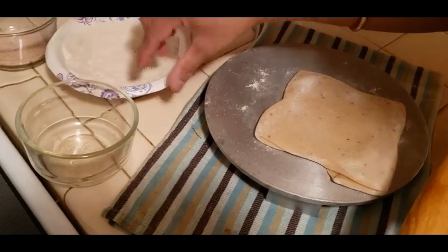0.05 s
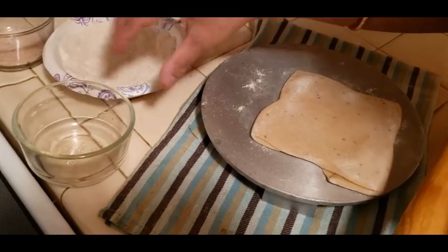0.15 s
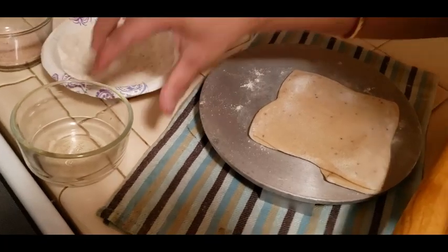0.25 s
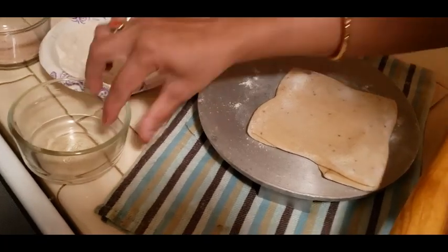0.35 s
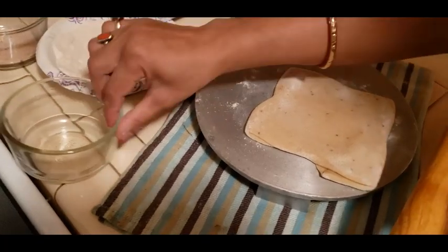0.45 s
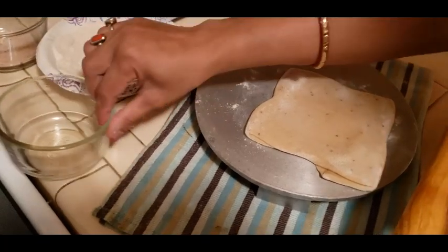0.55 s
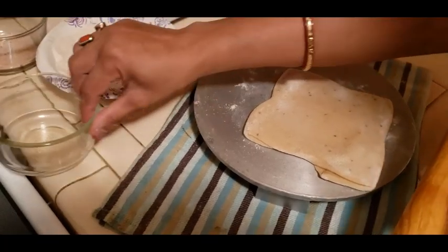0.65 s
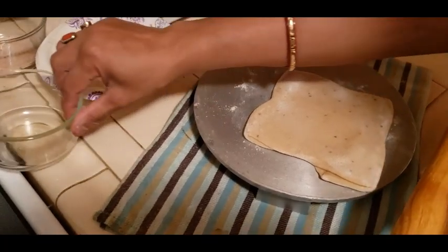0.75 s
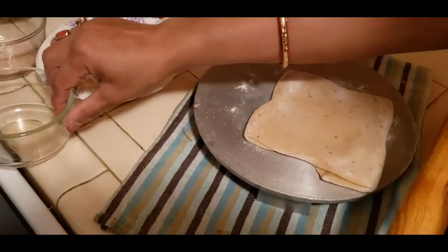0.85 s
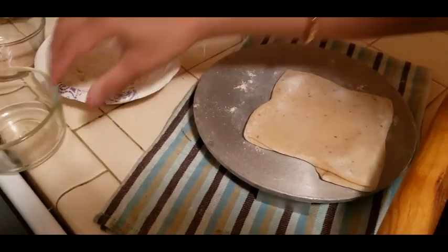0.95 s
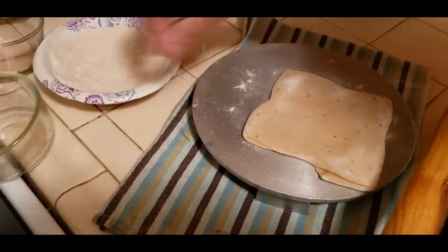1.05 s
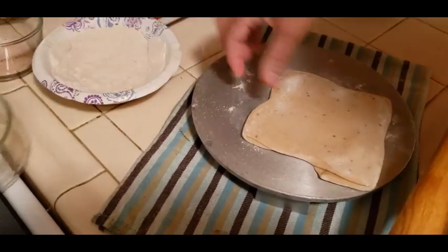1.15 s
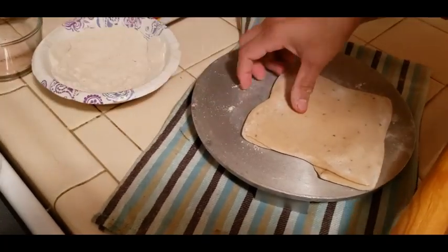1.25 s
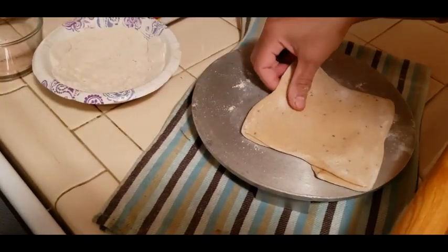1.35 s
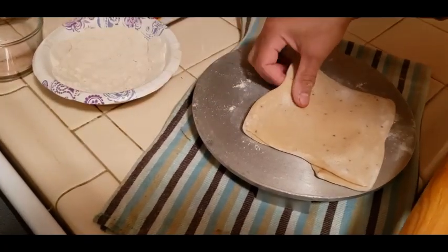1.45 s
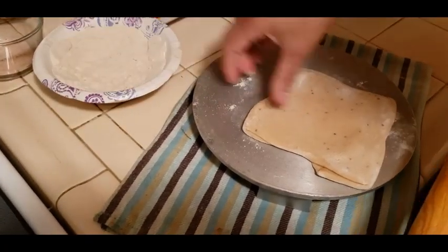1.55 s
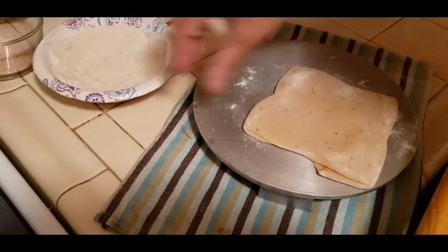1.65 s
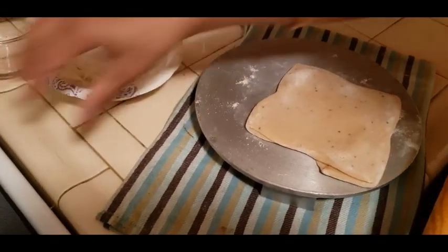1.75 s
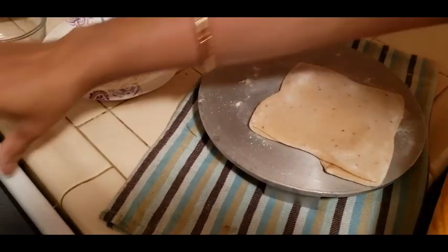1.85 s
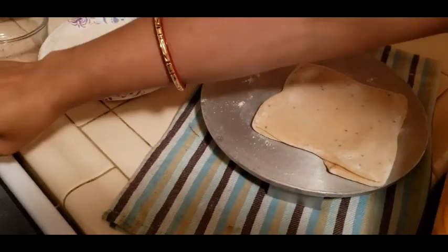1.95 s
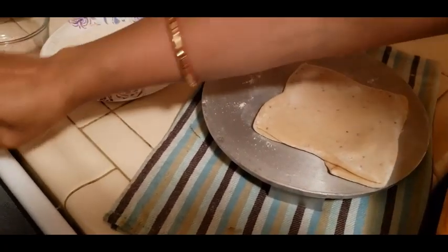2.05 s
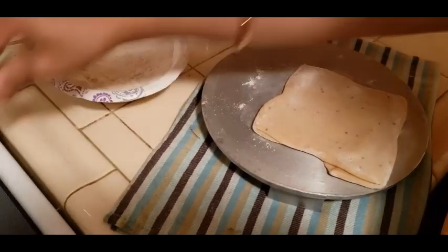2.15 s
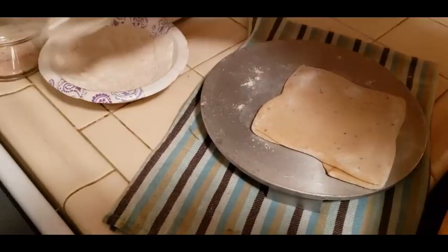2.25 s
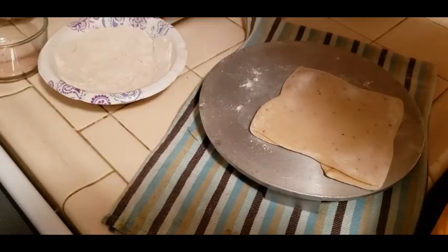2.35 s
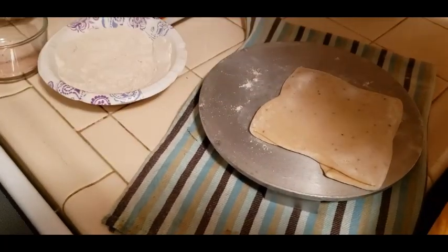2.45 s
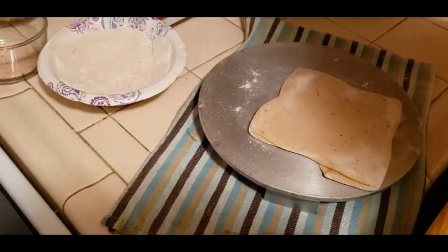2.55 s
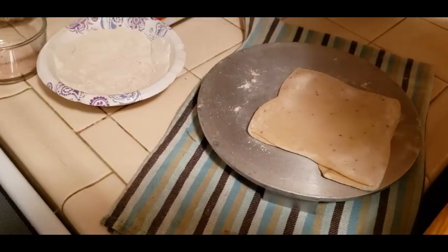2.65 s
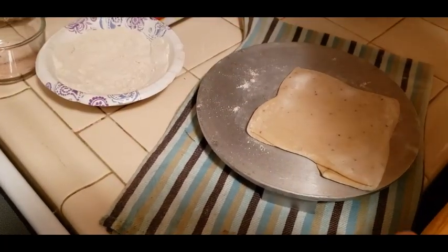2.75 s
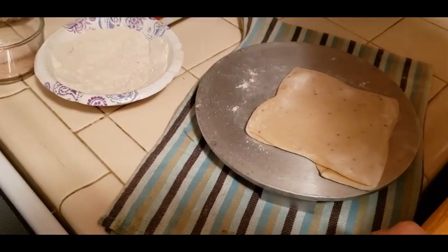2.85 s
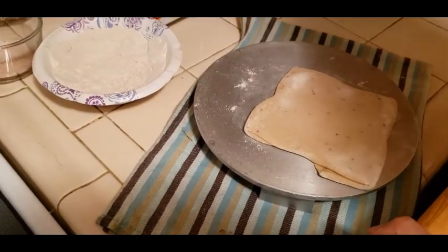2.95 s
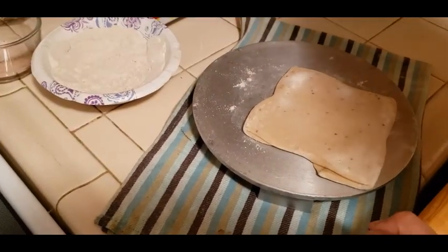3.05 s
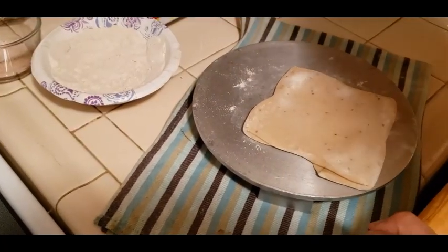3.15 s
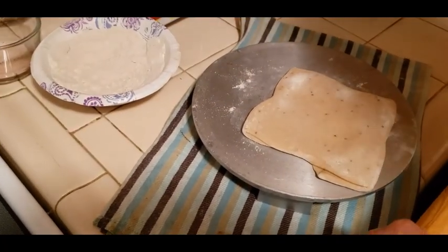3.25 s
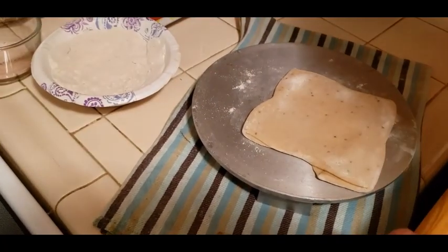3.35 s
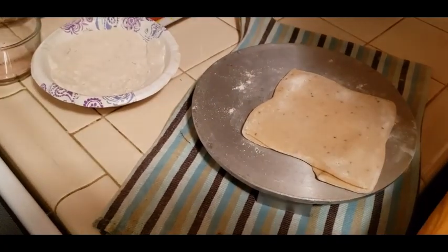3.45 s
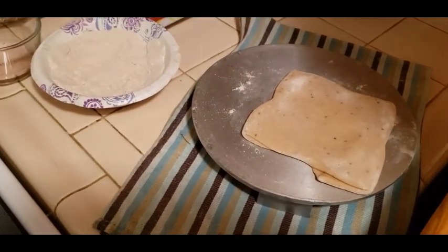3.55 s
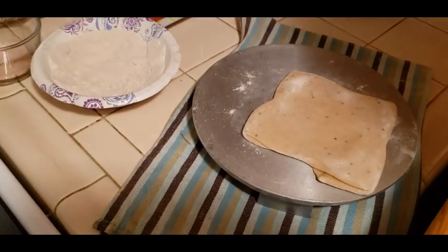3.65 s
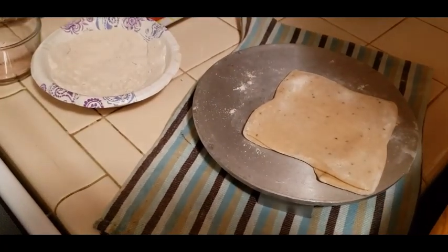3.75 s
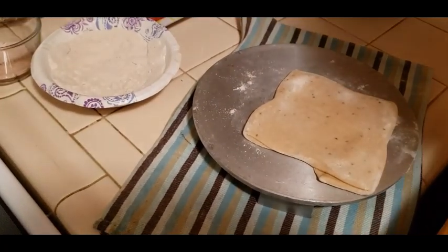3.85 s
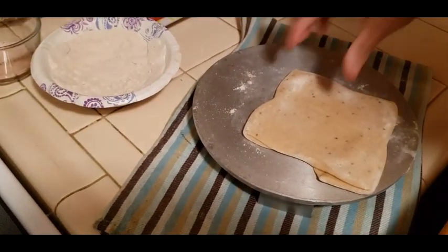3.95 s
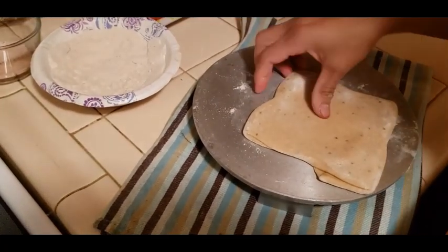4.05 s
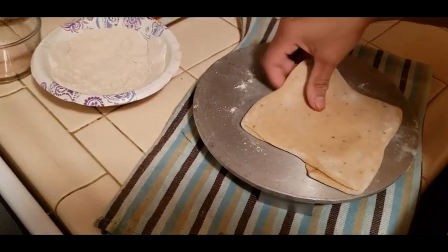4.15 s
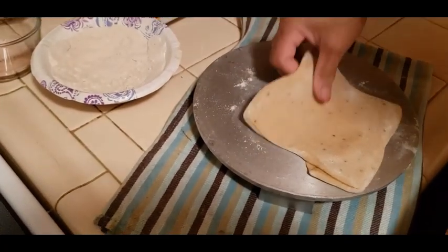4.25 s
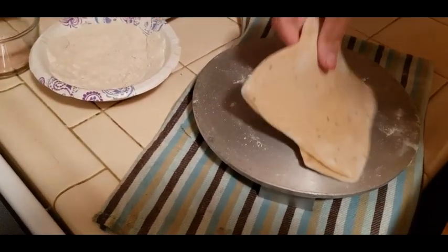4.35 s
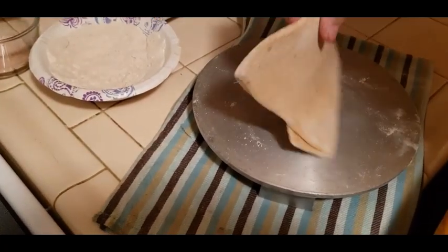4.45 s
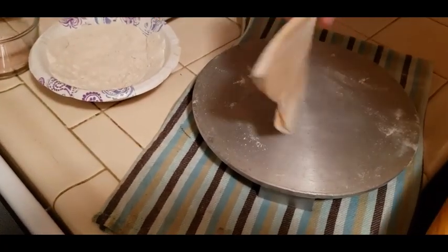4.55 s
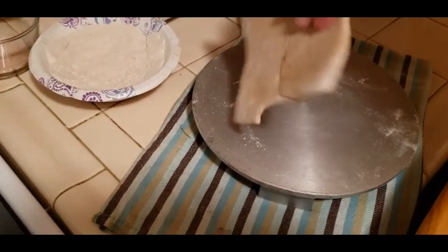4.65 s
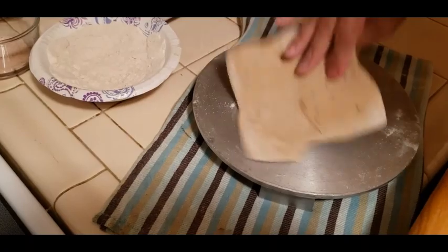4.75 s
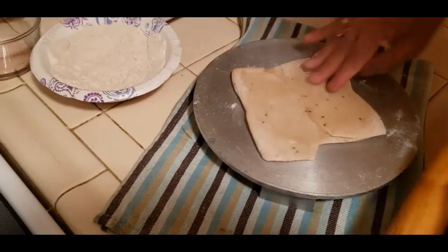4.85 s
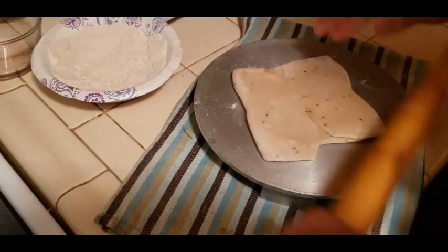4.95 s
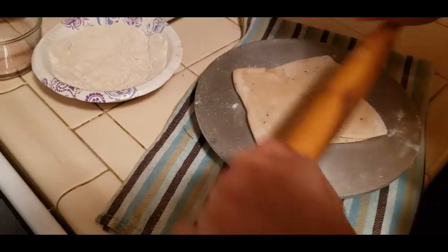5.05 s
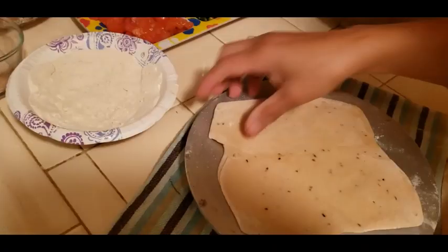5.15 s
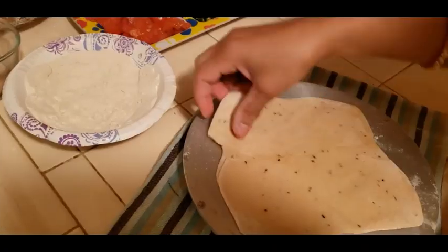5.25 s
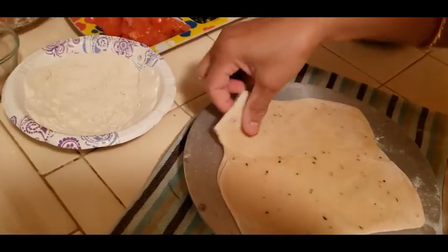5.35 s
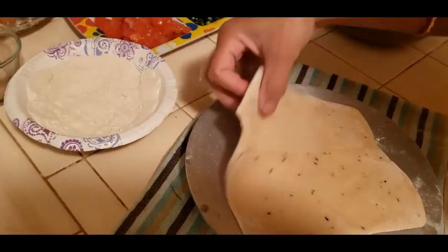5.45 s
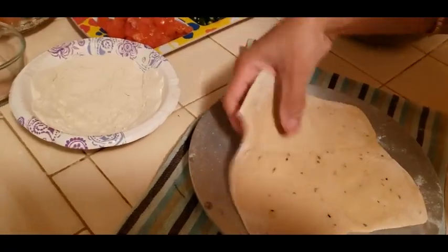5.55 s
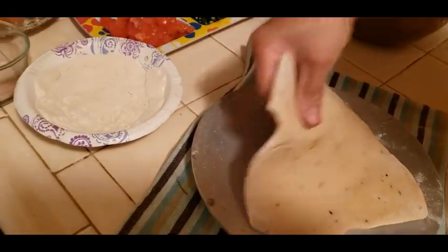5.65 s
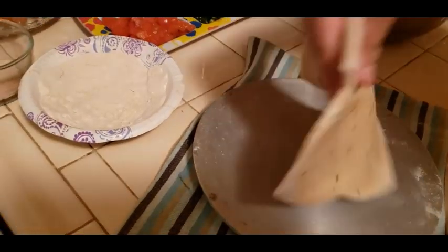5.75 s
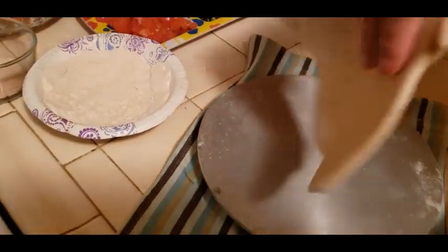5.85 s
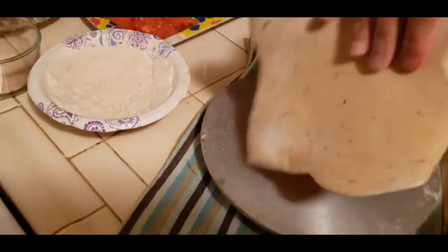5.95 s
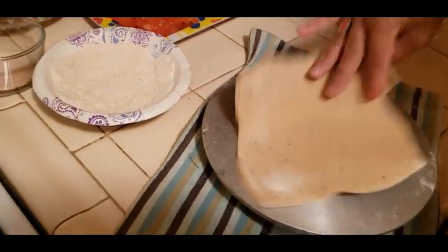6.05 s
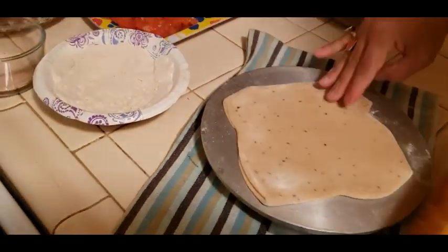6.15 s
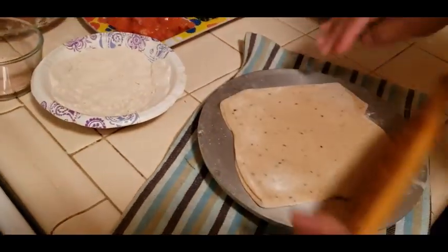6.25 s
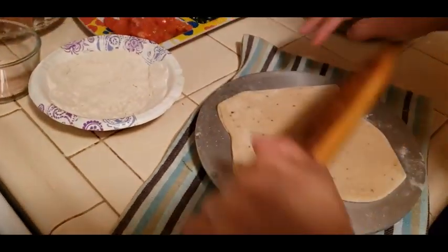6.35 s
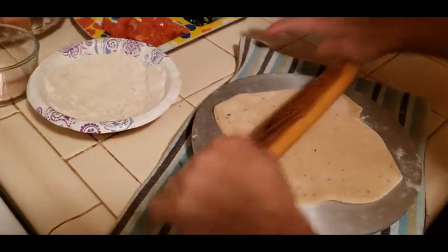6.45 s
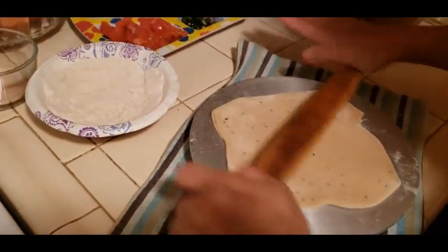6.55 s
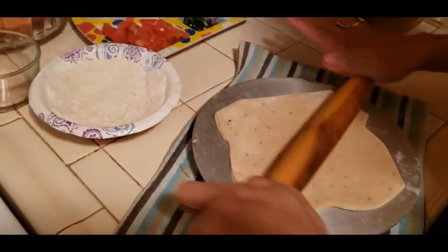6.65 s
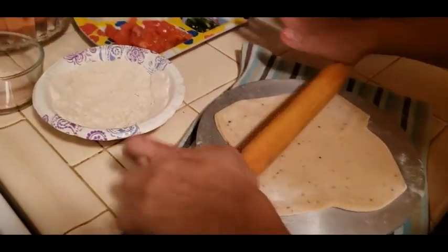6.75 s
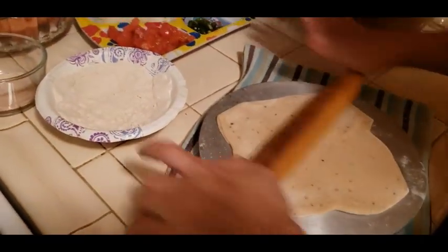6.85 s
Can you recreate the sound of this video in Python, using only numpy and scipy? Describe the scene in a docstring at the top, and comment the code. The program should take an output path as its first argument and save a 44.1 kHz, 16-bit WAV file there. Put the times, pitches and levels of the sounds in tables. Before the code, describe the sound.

A glass bowl scrapes and clatters across kitchen tiles, a wooden pin clacks twice, then dough slaps on a metal plate over a refrigerator hum.

```python
"""Bowl, rolling pin and dough at a kitchen counter

A glass bowl is pushed over tiles and clatters: struck modes and noise bursts over a gritty drag.
A wooden rolling pin knocks twice, as short clacks with wood modes. Dough is twice peeled off a metal plate
and slapped back, then the pin thuds onto it and rolls: wet noise, plate modes, bass thuds, rubbing strokes.
A refrigerator hums underneath in wavering sines and fan noise; diffuse echoes give a small hard room."""
import sys
import numpy as np
from scipy import signal
from scipy.fft import irfft
from scipy.io import wavfile
from scipy.ndimage import uniform_filter1d

SR = 44100
rng = np.random.default_rng(int(sys.argv[2]) if len(sys.argv) > 2 else 0)


def int16_out(signal):
    """Quantize to a 16-bit WAV file."""
    q = np.round(np.clip(np.atleast_2d(signal).T, -1, 1) * 32767)
    wavfile.write(sys.argv[1], SR, q.astype(np.int16))


N = 303836
TIME = np.arange(N) / SR
AGE = np.arange(int(SR * .6)) / SR  # seconds since a blow


def undb(db):
    """Decibels to gain."""
    return 10 ** (np.asarray(db) / 20)


def along(points, hz):
    """Read (Hz, value) points on a log-frequency axis."""
    point_hz, value = np.transpose(points)
    return np.interp(np.log(hz + 1e-3), np.log(point_hz), value)


def fade(t60_s):
    """Exponential decay of 60 dB in t60_s."""
    return np.exp(-np.log(1000) * AGE / t60_s)


def onset(rise_s):
    """A contact builds up with time constant rise_s."""
    return 1 - np.exp(-AGE / rise_s)


def ramp(start_s, length_s):
    """Smooth rise from 0 to 1 from start_s."""
    return np.sin(np.pi / 2 * np.clip((TIME - start_s) / length_s, 0, 1)) ** 2


STROKE_SHARPNESS = 1.78  # exponent


def stroke(start_s, rise_s):
    """Speed of a stroke: swells to 1 in rise_s and tails off more slowly."""
    x = np.maximum(TIME - start_s, 0) / rise_s
    return (x * np.exp(1 - x)) ** STROKE_SHARPNESS


def unit(x):
    """Scale to rms 1."""
    return x / np.sqrt(np.mean(x ** 2))


def blow(x):
    """Scale a blow to rms 1 over its first 30 ms."""
    return x / np.sqrt(np.mean(x[:, :int(.03 * SR)] ** 2))


def pan(x, left_db):
    """Set left minus right to left_db."""
    return x * undb(np.array([[left_db], [-left_db]]) / 2)


def add(out, start_s, x):
    """Mix x into out from start_s."""
    i = int(start_s * SR)
    out[:, i:i + x.shape[1]] += x[:, :N - i]


def walk(rate_hz):
    """Random levels, slow or fast, held 1 / rate_hz and slewed, rms 1."""
    hold = int(SR / rate_hz)
    steps = np.repeat(rng.standard_normal(N // hold + 1), hold)
    slewed = uniform_filter1d(uniform_filter1d(steps, hold), hold)
    return unit(slewed[:N])


# Likeness of left and right. Each row: frequency in Hz, correlation.
LIKENESS = [(100, .92), (280, 1), (550, 0.32), (1100, -0.014), (2200, -0.3), (5000, 0)]


def noise(spectrum, size):
    """Stereo noise of a given colour, rms 1, alike on both sides in the bass only."""
    hz = np.fft.rfftfreq(size, 1 / SR)
    mid, side = np.exp(2j * np.pi * rng.random((2, len(hz))))
    alike = np.clip(along(LIKENESS, hz), -1, 1)
    pair = mid * np.sqrt(1 + alike) + side * np.sqrt(1 - alike) * np.array([[1], [-1]])
    return unit(irfft(pair * undb(along(spectrum, hz)), size))


def ring(modes, pitch=1):
    """Struck modes as decaying sines; the higher ones reach the two sides in different phases."""
    out = 0
    for hz, db, t60_s in modes:
        alike = np.clip(along(LIKENESS, hz), -1, 1)
        apart = np.arccos(alike) * np.array([[.5], [-.5]])
        phase = 2 * np.pi * (hz * pitch * AGE + rng.random()) + apart
        out = out + undb(db) * fade(t60_s) * np.sin(phase)
    return out * onset(0.00047)


def hump(hz, skirt_db):
    """Spectrum of one broad resonance, skirt_db an octave away."""
    return [(hz * 2. ** k, skirt_db * abs(k) ** 2.2) for k in (-2, -1, -.5, 0, .5, 1, 2, 4)]


def favour(modes, centre_hz, db_per_octave):
    """The place of a blow favours the modes around one pitch."""
    return [(hz, db + db_per_octave * abs(np.log2(hz / centre_hz)), t60_s) for hz, db, t60_s in modes]


def room(sound, t60_s, treble_t60_s):
    """Diffuse echo of a small hard room: decaying noise whose treble has its own t60."""
    low_colour = [(60, -10.5), (300, -2), (2500, -2.5), (7000, -7.5), (15000, -31.5)]  # Hz, dB per Hz
    high_colour = [(2000, -14.5), (6000, -1.0), (15000, 2)]
    low = noise(low_colour, len(AGE)) * fade(t60_s)
    high = noise(high_colour, len(AGE)) * fade(treble_t60_s)
    tail = (low + undb(5) * high) * onset(.007)
    tail = tail / np.sqrt(np.sum(tail ** 2) / 2)
    return signal.fftconvolve(sound, tail, axes=1)[:, :N]


# Refrigerator lines. Each row: frequency in Hz, rms level in dB before the gains in kitchen().
HUM_LINES = [(118.4, -66), (161.5, -69), (317.6, -62.5), (414.5, -74), (479.1, -72.5), (915.2, -77.5),
             (1238, -82.5), (1437, -89.5)]
# Standing waves put each line to one side. Each row: frequency in Hz, left minus right in dB.
HUM_SIDE = [(120, 4), (318, -2), (900, 2)]
# Fan spectrum. Each row: frequency in Hz, relative level in dB per Hz.
FAN_COLOUR = [(22, -34.5), (38, -5.5), (65, -12), (100, -14), (140, -7.5), (250, -17.5), (292, -12),
              (319, -0.5), (352, -14.5), (620, -15), (1700, -31.5), (3800, -43), (7600, -40.5), (9200, -51)]
FAN_REL_DB, HUM_REL_DB, KITCHEN_GAIN_DB = -55.5, 1.92, 6.5
# The background sinks for a while and comes back.
LULL_START_S, LULL_END_S, LULL_FADE_S, LULL_DB = 1.2, 3.46, .75, -6


def kitchen():
    """Refrigerator lines waver in phase and level over the soft noise of its fan."""
    hum = 0
    for hz, db in HUM_LINES:
        phase = 2 * np.pi * hz * TIME + .7 * walk(14)
        level = np.sqrt(2) * undb(db + 1.7 * walk(10))
        hum = hum + level * pan(np.sin(phase), along(HUM_SIDE, hz))
    fan = noise(FAN_COLOUR, N) * undb(FAN_REL_DB + 0.1 * walk(6.9))
    lull = ramp(LULL_START_S, LULL_FADE_S) - ramp(LULL_END_S, LULL_FADE_S)
    return (pan(fan, left_db=1.5) + undb(HUM_REL_DB) * hum) * undb(KITCHEN_GAIN_DB + LULL_DB * lull)


# Strokes of fingers, dough and pin. Each row: start in seconds, time to full speed in seconds, level in dB.
RUBS = [(0, 0.033, -57.5), (4.095, 0.03, -54), (4.16, 0.051, -54.5), (4.33, 0.083, -59),
        (5.08, 0.045, -64.5), (5.28, 0.073, -55.5), (5.4, 0.085, -59.5), (5.58, 0.066, -59.5),
        (5.77, 0.037, -60.5), (6.44, 0.12, -64), (6.61, 0.11, -60), (6.79, .07, -59.5)]
# Sliding on flour. Each row: frequency in Hz, relative level in dB per Hz.
RUB_COLOUR = [(300, -2), (900, 11), (2000, 5.5), (3000, 6), (4200, 1), (6500, 1.5), (10000, -2.5),
              (13000, 1), (15500, -11)]
GRAINS_PER_S, GRAIN_T60_S, GRAIN_REL_DB = 55, .012, -9.5  # level re sliding
# The pin brushes the palm as it starts to roll.
ROLL_START_S, ROLL_ATTACK_S, ROLL_DB = 6.785, 0.061, -53.5


def rubbing():
    """Floury skin and dough slide in tiny slips over grains of flour; the turning pin adds a narrower hiss."""
    slips = unit(undb(0.56 * walk(400) + 1.04 * walk(47)))
    ticks = (rng.random(N) < GRAINS_PER_S / SR) * rng.standard_normal(N)
    grain = noise(RUB_COLOUR, len(AGE)) * fade(GRAIN_T60_S)
    grains = unit(signal.fftconvolve(ticks[None], grain, axes=1)[:, :N])
    speed = np.sqrt(sum((undb(db) * stroke(start_s, rise_s)) ** 2 for start_s, rise_s, db in RUBS))
    sliding = (slips * noise(RUB_COLOUR, N) + undb(GRAIN_REL_DB) * grains) * speed
    roll = undb(ROLL_DB) * ramp(ROLL_START_S, ROLL_ATTACK_S)
    return sliding + slips * noise(hump(3500, skirt_db=-40), N) * roll


# Pushes of the bowl over the tiles. Each row: start in seconds, length in seconds, starting level in dB.
PUSHES = [(.53, .55, -49), (1.09, 0.44, -31.5)]
PUSH_ATTACK_S, PUSH_RELEASE_S, PUSH_SAG_DB_PER_S = .02, 0.05, 33
# Glass modes, the high ones in close groups, a thin shimmering ring.
# Each row: frequency in Hz, relative level in dB, t60 in seconds.
GLASS_MODES = [(1967, 3, .33), (3311, -11, .22), (4570, -9, .18), (7460, -9, .05), (7532, 1, .14),
               (7620, -8, .06), (7950, -17, .1), (12100, -10, .06), (12190, -6, .08), (12260, -5, .09),
               (12380, -10, .07), (15400, -13, .07), (15480, -10, .1), (15590, -13, .07)]


def drag():
    """The foot sticks and slips on the tiles, fading as each push slows, and keeps the glass singing faintly."""
    grit_colour = [(150, -13.0), (550, 0.0), (850, 2.5), (1400, -2.5), (2500, -15.5), (4500, -21),
                   (15000, -29.5)]  # Hz, dB per Hz
    grit = unit(noise(grit_colour, N) * undb(3 * walk(300)))
    singing = unit(signal.fftconvolve(rng.standard_normal((2, N)), ring(GLASS_MODES), axes=1)[:, :N])
    effort = 0
    for start_s, length_s, db in PUSHES:
        sagging = undb(db - PUSH_SAG_DB_PER_S * np.maximum(TIME - start_s, 0))
        gate = ramp(start_s, PUSH_ATTACK_S) * (1 - ramp(start_s + length_s, PUSH_RELEASE_S))
        effort = effort + sagging * gate
    return pan(grit + undb(-15.5) * singing, left_db=-0.5) * effort


# Bowl on tile. Each row: start in seconds, force in dB, clack level in dB, clack pitch in Hz,
# glass ring level in dB, pitch that rings most in Hz.
KNOCKS = [(0.534, -45.5, -39, 1030, -62, 7500), (.64, -54.5, -54, 1100, -53, 9100),
          (1.088, -25.5, -22, 1193, -26.5, 9500), (1.128, -31.5, -22, 1300, -25.5, 12200),
          (1.15, -40, -36, 1700, -26.5, 1967), (1.177, -27, -26, 1400, -26, 5490),
          (1.2357, -24, -22.5, 2500, -27.5, 7026), (1.262, -31.5, -27, 1150, -30, 7500),
          (1.374, -22, -24.5, 800, -15.5, 7500), (1.384, -28, -27, 550, -29, 3000),
          (1.954, -46, -70, 600, -53, 2500), (1.989, -47.5, -68, 600, -53, 2700)]
# Counter and tile modes. Each row: frequency in Hz, relative level in dB, t60 in seconds.
COUNTER_MODES = [(122.5, -2, 0.38), (168.2, -4, 0.11), (245.6, -5, 0.056), (323.8, -5.5, 0.2),
                 (498.6, -2.5, 0.1), (581.3, -1.5, 0.26), (834, -4.5, 0.22)]
TILE_MODES = [(1149, -3, 0.059), (1202, 0.5, 0.088), (1376, 1, 0.11), (1390, -4.5, 0.045),
              (1610, -7, 0.098), (1657, -6.5, .14), (2300, -3.5, 0.21), (2618, -4.5, 0.13)]
# Noise of the counter and of the crack. Each row: frequency in Hz, relative level in dB per Hz.
THUMP_COLOUR = [(50, -28), (110, -4), (220, 2.5), (550, -1.5), (900, -8), (1800, -33.5)]
CRACK_COLOUR = [(900, -27.5), (2000, -7), (3000, -1), (4500, -6.5), (7000, -13), (10000, -19), (15500, -24)]
# Clack spectrum. Each row: multiple of the clack pitch, relative level in dB per Hz.
CONTACT_COLOUR = [(.2, -31), (.6, -9.5), (.9, 2.5), (1.15, 0), (1.5, -6), (2.1, -9.5), (3.199, -28),
                  (6, -48.5)]
KNOCK_T60_S, CRACK_T60_S, RING_DB_PER_OCTAVE = 0.15, 0.11, -9
# The crack equals the force at HARD_DB and grows faster than it.
HARD_DB, CRACK_GROWTH_DB_PER_DB = -26, 2.2


def knocks():
    """Each knock shakes the counter, clacks and cracks at the contact, and rings the glass by where it lands."""
    out = np.zeros((2, N))
    for start_s, force_db, clack_db, clack_hz, ring_db, ring_hz in KNOCKS:
        rumble = blow(noise(THUMP_COLOUR, len(AGE)) * fade(0.12))
        thump = blow(blow(ring(COUNTER_MODES)) + undb(-1.0) * rumble) * onset(.002)
        # the contact sets which tile modes speak
        contact = hump(clack_hz, skirt_db=-8.0)
        tile = ring([(hz, db + along(contact, hz), t60_s) for hz, db, t60_s in TILE_MODES])
        colour = [(clack_hz * ratio, db) for ratio, db in CONTACT_COLOUR]
        burst = blow(noise(colour, len(AGE)) * fade(KNOCK_T60_S) * onset(.0005))
        clack = blow(burst + undb(-5.0) * blow(tile))
        # glass chatters on the glaze
        chatter = undb(1.7 * walk(600)[:len(AGE)])
        crack = blow(noise(CRACK_COLOUR, len(AGE)) * fade(CRACK_T60_S) * chatter * onset(.0004))
        crack_db = HARD_DB + CRACK_GROWTH_DB_PER_DB * (force_db - HARD_DB)
        glass = ring(favour(GLASS_MODES, ring_hz, RING_DB_PER_OCTAVE))
        add(out, start_s, undb(force_db) * pan(thump, left_db=2.5))
        add(out, start_s, undb(clack_db) * pan(clack, left_db=3.0))
        add(out, start_s, undb(crack_db) * pan(crack, left_db=4.0))
        add(out, start_s, undb(ring_db) * pan(glass, left_db=0.5))
    return out


# The bowl's rim touches another glass. Each row: start in seconds, level in dB.
CLINKS = [(1.487, -30.5), (1.953, -82), (2.002, -66.5)]
# Rim modes. Each row: frequency in Hz, relative level in dB, t60 in seconds.
RIM_MODES = [(1967, -5.5, 0.35), (2293, -2, .14), (2330, 1, 0.15), (2560, -0.5, .17), (2660, -13, .12),
             (2805, -4, 0.33), (3020, -12, .12), (3311, -1.5, 0.24), (3429, -9, 0.24), (4610, -3.5, 0.27),
             (5335, -12, 0.18), (5990, -7.5, 0.19), (8527, -8, 0.14), (12050, -4, 0.14)]


def clinks():
    """Glass on glass: a bright cluster of modes with a burst of contact noise."""
    out = np.zeros((2, N))
    for start_s, db in CLINKS:
        tick = blow(noise(CRACK_COLOUR, len(AGE)) * fade(0.21))
        clink = blow(ring(RIM_MODES)) + undb(-6.0) * tick
        add(out, start_s, undb(db) * pan(clink, left_db=3.0))
    return out


def bowl():
    """The glass bowl on the hard tiles, heard with the room."""
    direct = knocks() + clinks() + drag()
    return direct + undb(-11.5) * room(direct, t60_s=0.43, treble_t60_s=0.21)


# Soft dull thuds of bowl, hand and rolling pin. Each row: start in seconds, level in dB.
THUDS = [(1.96, -48.5), (2.018, -46.5), (4.85, -48), (5.207, -42), (5.231, -42), (6.538, -33.5),
         (6.573, -36.5), (6.795, -46.5)]
# Plate bouncing on its cloth. Each row: frequency in Hz, relative level in dB, t60 in seconds.
BOUNCE_MODES = [(57, -15, .14), (86, -13, 0.12), (104, -3.5, 0.044), (262, -7, 0.046)]
# Thud noise. Each row: frequency in Hz, relative level in dB per Hz.
THUD_COLOUR = [(25, -20), (50, -18), (85, 1.5), (140, -10), (260, -18.5), (600, -20.5), (1200, -38),
               (4000, -53)]
THUD_T60_S = .17


def thuds():
    """Soft dull thuds, low modes under a burst of dark noise; mostly bass gets through."""
    out = np.zeros((2, N))
    for start_s, db in THUDS:
        dull_noise = blow(noise(THUD_COLOUR, len(AGE)) * fade(THUD_T60_S))
        body = blow(ring(BOUNCE_MODES)) + undb(6) * dull_noise
        add(out, start_s, undb(db) * blow(body * onset(0.0017)))
    return out


# Pin on the counter. Each row: start in seconds, level in dB, thin high ring level in dB, ring pitch in Hz.
PIN_KNOCKS = [(3.509, -27.5, -30.5, 12060), (3.6316, -28, -42.5, 12200), (3.646, -31, -38.5, 9800)]
# Wood on tile. Each row: frequency in Hz, relative level in dB per Hz.
WOOD_COLOUR = [(100, -13), (300, -13.5), (850, -11.5), (1230, 2), (1650, -4.5), (2200, -5), (3000, -8.5),
               (4500, -21.5), (6500, -36), (10000, -54), (15000, -53)]
# Pin modes. Each row: frequency in Hz, relative level in dB, t60 in seconds.
WOOD_MODES = [(1175, -1.5, 0.075), (1217, 0, 0.091), (1317, -3, 0.07), (1435, 2.5, 0.061),
              (1684, -2.5, .08), (1974, -7, 0.25), (2760, -10, .08)]


def pin():
    """Hard wood clacks drily on the tiles and leaves a thin high ring."""
    out = np.zeros((2, N))
    for start_s, db, ring_db, ring_hz in PIN_KNOCKS:
        clack = blow(noise(WOOD_COLOUR, len(AGE)) * fade(0.13) * onset(0.00045))
        body = blow(ring(WOOD_MODES))
        knock = blow(pan(clack, left_db=3) + undb(-2) * pan(body, left_db=-6.5))
        thin_ring = ring(favour(GLASS_MODES, ring_hz, db_per_octave=-22.5))
        add(out, start_s, undb(db) * knock)
        add(out, start_s, undb(ring_db) * pan(thin_ring, left_db=-3))
    return out + undb(-13.5) * room(out, t60_s=0.47, treble_t60_s=0.41)


# Dough landing on the plate. Each row: start in seconds, wet smack level in dB, plate level in dB,
# plate pitch factor, pitch that rings most in Hz (before that factor), left minus right of the plate in dB.
SLAPS = [(4.094, -59, -66, .91, 2500, 0), (4.828, -41.5, -33, 0.94, 780, -2),
         (4.833, -46.5, -41, 0.99, 2300, 2), (5.202, -58, -52, 0.96, 890, -1),
         (6.143, -48, -44, .98, 1400, 2), (6.15, -31, -34, 1.05, 1450, 0),
         (6.161, -33, -35.5, 1.04, 1430, 1), (6.175, -38.5, -39.5, 1.04, 950, 0),
         (6.532, -59.5, -56, 0.98, 1300, 0)]
# Wet smack. Each row: frequency in Hz, relative level in dB per Hz.
SMACK_COLOUR = [(300, -7.5), (800, -12), (1500, 1.5), (2000, -2), (3000, -3), (5000, -4), (8000, -10.5),
                (12000, -12), (15500, -18)]
# Plate modes. Each row: frequency in Hz at pitch factor 1, relative level in dB, t60 in seconds.
PLATE_MODES = [(638, -4.5, 0.04), (750, -2.5, 0.044), (804, 0, 0.061), (875, -1, .05), (1032, -9.5, 0.17),
               (1306, -10, 0.055), (1420, -0.5, 0.047), (1618, -3, 0.024), (3060, -2, 0.1)]
SLAP_RISE_S, SLAP_T60_S, PLATE_DB_PER_OCTAVE = 0.00095, 0.089, -8
# The hanging edge of the dough touches first.
BRUSH_LEAD_S, BRUSH_REL_DB = 0.072, -26.5  # level re smack


def slaps():
    """Dough brushes the plate, meets it patch by patch with a wet smack and damps the metal as it rings."""
    out = np.zeros((2, N))
    brush = 0
    contact = onset(SLAP_RISE_S)
    for start_s, smack_db, plate_db, pitch, ring_hz, left_db in SLAPS:
        patches = undb(3.8 * walk(527)[:len(AGE)])
        smack = blow(noise(SMACK_COLOUR, len(AGE)) * patches * fade(SLAP_T60_S) * contact)
        plate = blow(ring(favour(PLATE_MODES, ring_hz, PLATE_DB_PER_OCTAVE), pitch) * contact)
        add(out, start_s, undb(smack_db) * pan(smack, left_db=1.6))
        add(out, start_s, undb(plate_db) * pan(plate, left_db))
        brush = brush + undb(smack_db + BRUSH_REL_DB) * stroke(start_s - BRUSH_LEAD_S, BRUSH_LEAD_S)
    return out + brush * noise(RUB_COLOUR, N)


def dough():
    """The work on the plate lies closest and sounds driest."""
    direct = slaps() + thuds() + rubbing()
    return direct + undb(-14.5) * room(direct, t60_s=0.36, treble_t60_s=0.25)


def scene():
    """Bowl, rolling pin and dough over the hum of the kitchen."""
    return bowl() + pin() + dough() + kitchen()


TOP_HZ = 15900


def record(dry):
    """The recorder rounds the highest peaks and cuts the top."""
    rounded = np.tanh(dry)
    lowpass = signal.ellip(8, .2, 70, TOP_HZ, fs=SR, output="sos")
    return signal.sosfilt(lowpass, rounded)


dry = scene()
out = record(dry)
int16_out(out)
```